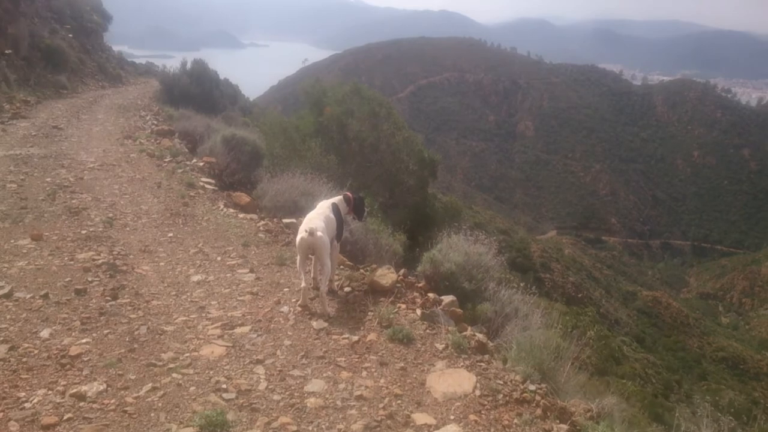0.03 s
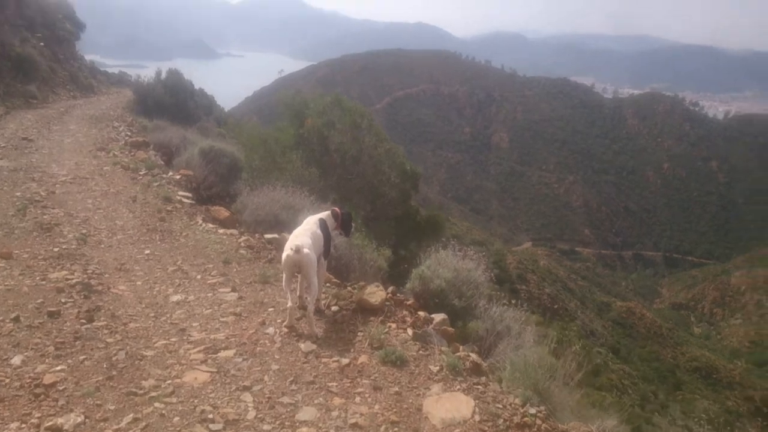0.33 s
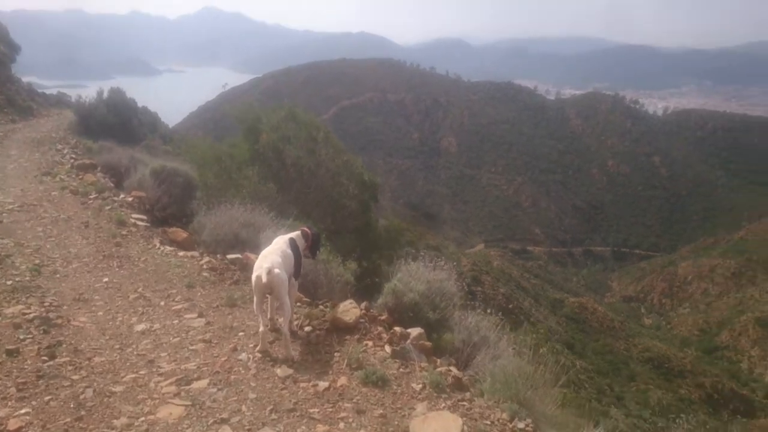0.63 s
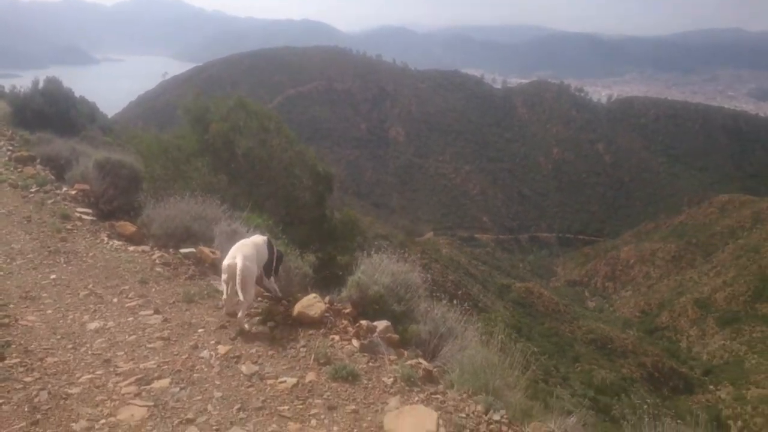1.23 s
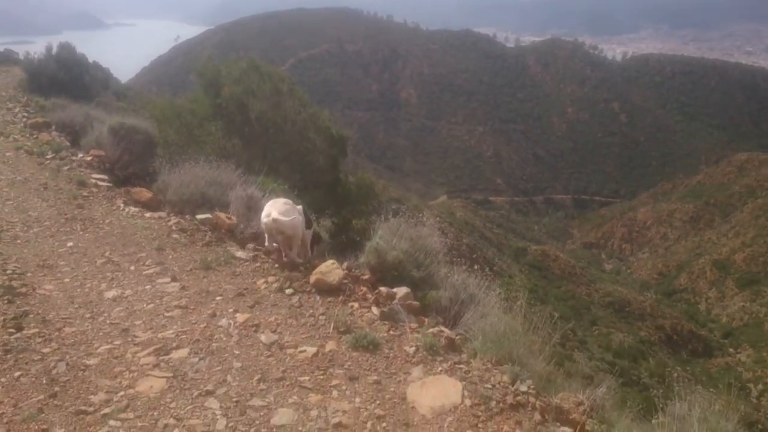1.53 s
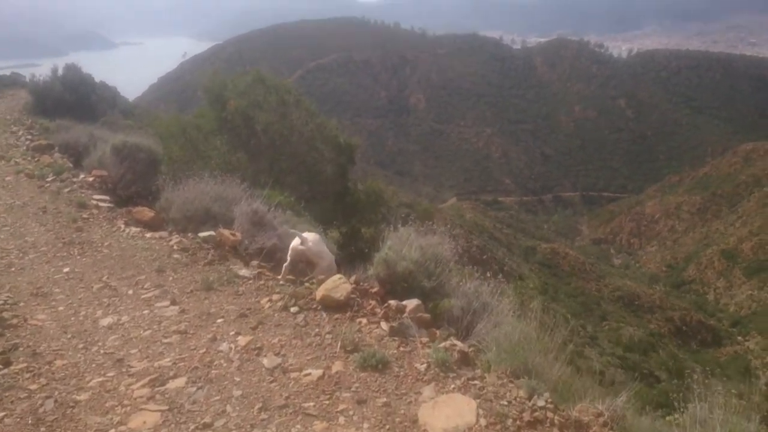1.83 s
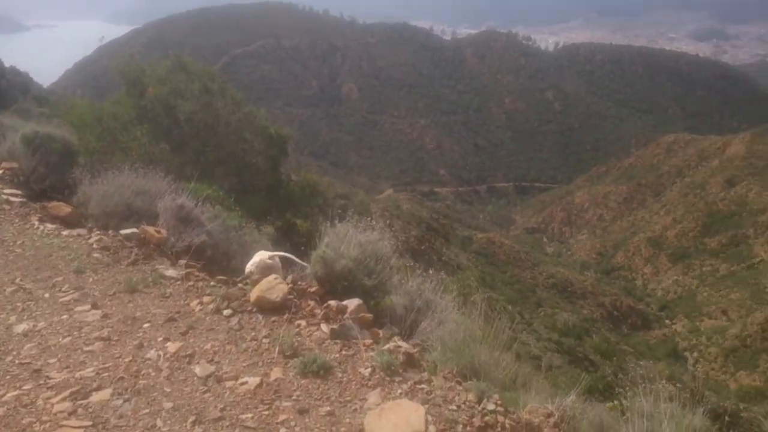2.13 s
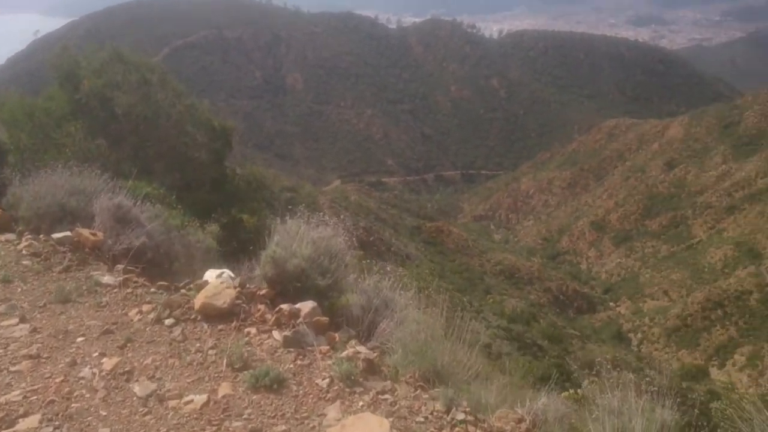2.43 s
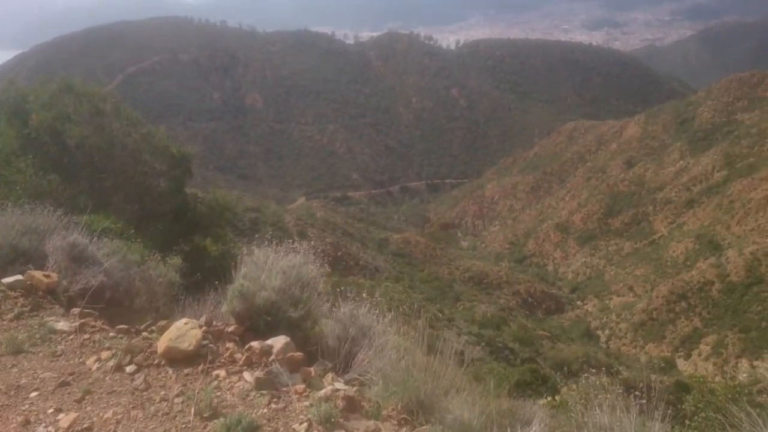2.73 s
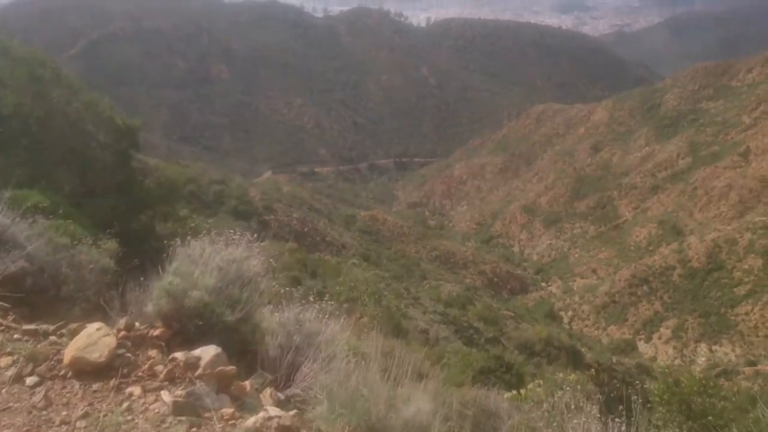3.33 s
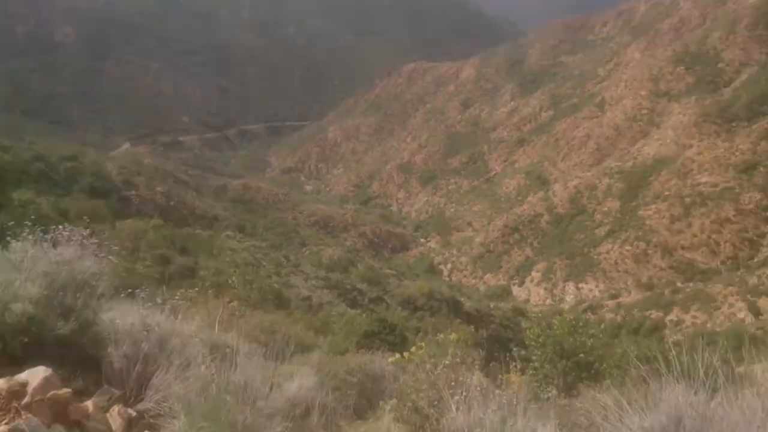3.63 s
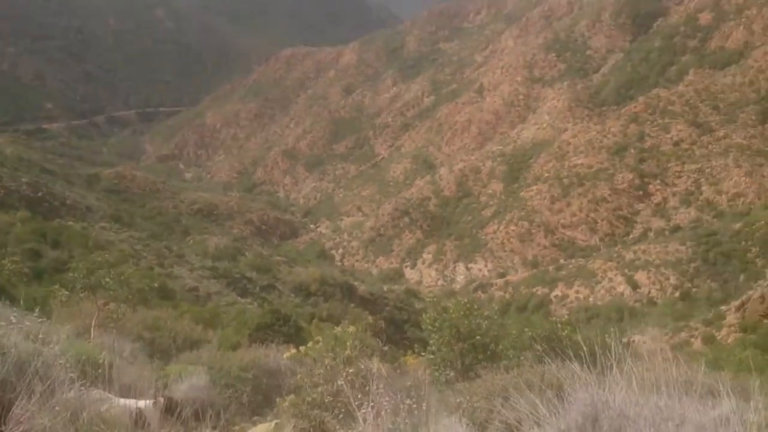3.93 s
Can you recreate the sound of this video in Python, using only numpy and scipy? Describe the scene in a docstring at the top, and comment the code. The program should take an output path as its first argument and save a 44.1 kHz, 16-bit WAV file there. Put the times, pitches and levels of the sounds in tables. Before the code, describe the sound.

One hard crack against the camera, after faint rustling in dry brush and low wind buffeting.

```python
"""Light wind buffets the right port of a hand-held camera over faint hiss; feet shift on loose stones
and fingers rub the case. A dog pushes off the hillside track into dry scrub: stems rustle, leaves
crackle and twigs snap, mostly to the right. Something hard, perhaps a strap clip, strikes by the
left port and bounces; the case rings and buzzes. Faint quick squeaks follow."""
import sys
import numpy as np
from scipy import signal
from scipy.fft import rfft, irfft, next_fast_len
from scipy.io import wavfile
from scipy.ndimage import map_coordinates

SR = 44100
rng = np.random.default_rng(int(sys.argv[2]) if len(sys.argv) > 2 else 0)


def log_audio(samples):
    """Write samples as a 16-bit WAV file to the path given in sys.argv[1]."""
    # one column per channel
    frames = np.atleast_2d(samples).T
    # limit to full scale, then quantise
    limited = np.clip(frames, -1, 1)
    pcm = np.round(limited * 32767).astype(np.int16)
    wavfile.write(sys.argv[1], SR, pcm)


N = 176400

# wind buffeting (time [s], level [dB])
WIND_LEVEL = [(0, -51), (.3, -51.5), (.44, -48), (.66, -47.5), (.85, -56), (1.44, -60.5), (1.51, -46),
              (1.59, -51.5), (1.78, -48), (2.07, -43), (2.2, -38.5), (2.6, -36.5), (2.75, -38),
              (3.3, -38.5), (3.83, -40.5), (3.92, -31)]
# buffeting spectrum (frequency [Hz], gain [dB])
WIND_SPECTRUM = [(18, 13), (45, 2), (80, -5.5), (130, -19.5), (220, -30), (600, -80)]
# wind puffs (time [s], width [s], level [dB])
PUFFS = [(.445, 0.017, -54.5), (1.95, 0.011, -45.5), (2.27, 0.02, -43), (2.44, 0.021, -41),
         (2.555, 0.014, -39), (2.8, 0.022, -41.5), (2.925, 0.04, -33.5), (3.5, 0.0056, -31)]
# background hiss (time [s], level [dB])
HISS_LEVEL = [(.84, -70), (.9, -73.5), (1.45, -73.5), (1.75, -69.5), (4, -66.5)]
# hiss spectrum (frequency [Hz], gain [dB])
HISS_SPECTRUM = [(60, -3), (250, -6), (700, -8.5), (1500, -13.5), (6500, -18.5), (9300, -15), (12000, -19),
                 (15500, -31)]
# hiss balance (frequency [Hz], left over right [dB])
HISS_BALANCE = [(300, 0.5), (4000, -4.5), (8000, 6.5)]
# clicks and scrapes of stones underfoot and, at 2.6-2.7 s, of fingers on the case
# (time [s], gain [dB], centre [Hz], t60 [s])
SCRAPES = [(.3294, -33.5, 744, 0.026), (0.3292, -32.5, 1860, 0.017), (.3355, -40, 820, 0.056),
           (0.445, -49, 950, 0.12), (.482, -38.5, 1550, 0.031), (2.169, -42.5, 1080, 0.033),
           (2.47, -50.5, 1140, 0.16), (2.6, -45, 820, .017), (2.636, -44, 1020, 0.12),
           (2.682, -40, 720, 0.021), (2.844, -41, 800, 0.028), (2.911, -38.5, 1250, 0.006),
           (3.054, -31, 1090, 0.0047), (3.136, -42.5, 600, 0.16), (3.162, -35.5, 2400, 0.1),
           (3.165, -35, 960, 0.055), (3.221, -39.5, 3270, 0.056), (3.397, -35, 2480, 0.015),
           (3.639, -41.5, 965, 0.026), (3.676, -28.5, 1480, 0.0064), (3.9, -37, 1688, 0.029),
           (3.914, -31.5, 650, 0.013), (3.948, -41.5, 2000, 0.016)]
# spectrum common to all scrapes (frequency [Hz], gain [dB])
SCRAPE_SPECTRUM = [(450, 12), (760, 7.5), (1450, -4.5), (2000, 7), (3000, -0.5), (5000, 0), (6200, -8),
                   (11000, -5), (15000, -32)]
# balance of scrapes, scrub and twigs (frequency [Hz], left over right [dB])
RIGHT_BIAS = [(1200, 0), (2000, -20), (7500, -34), (11000, -10)]
# foot thuds (time [s], width [s], level [dB])
FOOT_THUDS = [(.333, 0.0038, -50), (3.17, 0.017, -41.5)]
# spectrum of thuds and rubs (frequency [Hz], gain [dB])
DULL_SPECTRUM = [(60, -10), (140, -6.5), (300, -11), (500, -31), (1000, -37), (7000, -75)]
# fingers on the case (time [s], width [s], level [dB])
FINGER_RUBS = [(.585, 0.022, -56), (2.65, 0.031, -49.5), (3.37, .054, -49.5), (3.71, 0.084, -49)]
# stem rustle (time [s], level [dB])
STEM_LEVEL = [(1.4, -79), (1.68, -71.5), (1.8, -54), (2, -68.5), (2.23, -63), (2.4, -67), (3.05, -66),
              (3.4, -48.5), (3.62, -65.5), (3.8, -61.5), (3.93, -56.5)]
# stem filter (frequency [Hz], gain [dB])
STEM_SPECTRUM = [(250, 3), (700, 3), (1400, -6.5), (2300, -2.5), (3500, -13), (8000, -18)]
# leaf crackle (time [s], level [dB])
LEAF_LEVEL = [(1.4, -78), (1.68, -68), (1.85, -57), (2, -64), (2.23, -65), (2.45, -69), (3, -71.5),
              (3.25, -63.5), (3.73, -59.5), (3.8, -66), (3.91, -55)]
# leaf filter (frequency [Hz], gain [dB])
LEAF_SPECTRUM = [(800, 5.5), (2200, -0.5), (5800, -2.5), (7600, 1), (10000, -15.5), (16000, -22)]
# twigs snapping (time [s], gain [dB], t60 [s])
TWIG_SNAPS = [(1.438, -58, 0.039), (1.584, -50.5, 0.12), (1.711, -52, 0.034), (1.72, -51.5, 0.085),
              (1.751, -54.5, 0.11), (1.827, -57, 0.025), (1.853, -52.5, 0.091), (2.027, -50, 0.016),
              (2.048, -57.5, 0.028), (2.193, -53.5, 0.22), (2.262, -57, 0.093)]
# spectrum common to all twigs (frequency [Hz], gain [dB])
TWIG_SPECTRUM = [(200, 0), (700, 7.5), (2300, 13), (4300, 5.5), (5800, 6.5), (7800, 8), (10500, -13.5),
                 (15500, -21)]
# graze, blow, bounce on the case (time [s], gain [dB], bass [dB], top treble [dB])
CASE_HITS = [(3.3138, -29.5, 10.5, -12), (3.3189, -3, 0, 1), (3.33, -15.5, -6.5, -9)]
# case response to a hit (frequency [Hz], gain [dB])
CRACK_SPECTRUM = [(100, -6), (290, 6), (410, 18), (550, 11), (720, 26), (880, 28), (1300, 24), (1550, 11),
                  (2600, -4), (3100, 14), (4900, 16), (6000, 3), (7200, 13), (9100, 13), (10400, -1),
                  (13600, 0), (16000, -14)]
# its dispersion (frequency [Hz], extra delay [s])
CRACK_DELAY = [(2000, 0.00012), (4000, 0.001334), (7000, 0.000306)]
# case modes (frequency [Hz], level [dB], t60 [s])
CASE_MODES = [(403, -41, 1.1), (726, -25, .2), (3950, -31, .025), (5210, -45, .13), (5350, -44, .16),
              (5730, -43, .17)]
# buzz of loose case parts (frequency [Hz], gain [dB])
BUZZ_SPECTRUM = [(3800, 2), (14000, -21)]


def amp(db):
    """Decibels to gain."""
    return 10 ** (np.asarray(db) / 20)


def unit(x):
    """Scale to rms 1."""
    return x / np.sqrt(np.mean(x ** 2) + 1e-20)


def along(points, hz):
    """Interpolate (frequency [Hz], value) points on a log axis."""
    f, v = np.transpose(points)
    return np.interp(np.log(hz + 1), np.log(f + 1), v)


def level(rows):
    """Gain per sample from (time [s], level [dB]) rows."""
    return amp(np.interp(np.arange(N) / SR, *np.transpose(rows)))


def swells(rows):
    """Gaussian swells from (time [s], width [s], level [dB]) rows."""
    t = np.arange(N) / SR
    return sum(amp(db) * np.exp(-.5 * ((t - at_s) / width_s) ** 2) for at_s, width_s, db in rows)


def wobble(rate_hz):
    """Smooth curve through random knots."""
    knots = rng.standard_normal(int(N * rate_hz / SR) + 4)
    return map_coordinates(knots, [np.arange(N) * rate_hz / SR])


def filtered(x, response):
    """Apply a gain given as a function of frequency."""
    n = x.shape[-1]
    m = next_fast_len(n + SR // 10)
    return irfft(rfft(x, m) * response(np.fft.rfftfreq(m, 1 / SR)), m)[..., :n]


def pan(left_db):
    """Constant-power left and right gains."""
    g = amp(np.atleast_1d(left_db))
    return np.array([g, np.ones_like(g)]) * np.sqrt(2 / (1 + g * g))


def coloured(x, spectrum, balance):
    """Stereo at rms 1, filtered and panned per frequency."""
    return unit(filtered(x, lambda hz: amp(along(spectrum, hz)) * pan(along(balance, hz))))


def noise():
    """Independent white noise per port."""
    return rng.standard_normal((2, N))


def impulse(gain_db, delay_s=np.zeros_like, size=4096):
    """Minimum-phase impulse response plus a delay per frequency."""
    hz = np.fft.rfftfreq(size, 1 / SR)
    cepstrum = irfft(np.log(amp(gain_db(hz))))
    cepstrum[..., 1:size // 2] *= 2
    cepstrum[..., size // 2 + 1:] = 0
    lag_rad = 2 * np.pi * np.cumsum(delay_s(hz)) * SR / size
    return irfft(np.exp(rfft(cepstrum) - 1j * lag_rad))[..., :size // 2]


def add(out, at_s, x):
    """Mix x into out."""
    i = round(at_s * SR)
    n = min(x.shape[-1], N - i)
    out[:, i:i + n] += x[..., :n]


def wind():
    """Lumpy low buffeting and brief puffs, far stronger on the right port."""
    rumble = coloured(noise(), WIND_SPECTRUM, balance=[(40, -20), (150, -13)])
    buffet = unit(rumble * amp(3.2 * wobble(rate_hz=16)))
    flutter = coloured(noise(), [(30, -3), (72, 8), (120, -6.5), (500, -74.5)], balance=[(80, -28)])
    return level(WIND_LEVEL) * buffet + swells(PUFFS) * flutter


def hiss():
    """Faint even hiss."""
    return level(HISS_LEVEL) * coloured(noise(), HISS_SPECTRUM, HISS_BALANCE)


def crunch(t60_s, spike, scatter_db=5):
    """A first contact and a fading spray of others; energy grows with length."""
    t = np.arange(SR // 4) / SR
    sizes = amp(scatter_db * np.repeat(np.clip(rng.standard_normal(len(t)), -2, 2), 32)[:len(t)])
    attack_s = .015 * t60_s
    fade = amp(-60 * t / t60_s) * (1 - np.exp(-t / attack_s))
    spray = (rng.standard_normal(len(t)) + rng.standard_normal((2, len(t)))) * sizes * fade
    spray /= np.linalg.norm(spray, axis=1, keepdims=True)
    spray[:, 0] += spike
    return spray / np.linalg.norm(spray[0]) * np.linalg.norm(fade)


def scrapes(width_oct=.66, skirt_db=-22):
    """Short clicks and scrapes of stones underfoot and fingers on the case; heavier steps thud."""
    out = np.zeros((2, N))
    for at_s, db, centre_hz, t60_s in SCRAPES:
        def body_db(hz):
            hump = np.exp(-.5 * (np.log2((hz + 1) / centre_hz) / width_oct) ** 2) + amp(skirt_db)
            return along(SCRAPE_SPECTRUM, hz) + 20 * np.log10(hump * pan(along(RIGHT_BIAS, hz)))
        contacts = crunch(t60_s, spike=.45)
        click = signal.fftconvolve(contacts, impulse(body_db), axes=1)
        add(out, at_s, amp(db) * click * np.linalg.norm(contacts[0]) / np.linalg.norm(click))
    return out + swells(FOOT_THUDS) * coloured(noise(), DULL_SPECTRUM, balance=[(200, -1)])


def fingers(rough_db=2.5):
    """Fingers rub the case near the left port."""
    friction = swells(FINGER_RUBS) * amp(rough_db * wobble(rate_hz=55))
    return friction * coloured(noise(), DULL_SPECTRUM, balance=[(200, 11.7)])


def crackle(count, top_hz, decay_s, spread_db):
    """Tiny soft-edged fractures, random in time and pitch, with a phase shift per port."""
    strength, onset, pitch, phase, *port_shifts = rng.random((count, 6)).T[:, :, None]
    t = np.arange(SR // 140) / SR
    size = amp(spread_db * np.minimum(-np.log(1 - strength), 4))
    envelope = size * t * np.exp(-t / decay_s)
    angle_rad = 2 * np.pi * (top_hz * pitch * t + phase)
    samples = ((onset * N).astype(int) + np.arange(len(t))).ravel()
    ports = [envelope * np.sin(angle_rad + np.pi * shift) for shift in port_shifts]
    return unit(np.array([np.bincount(samples, grains.ravel(), N)[:N] for grains in ports]))


def scrub():
    """Stems scrape and dry leaves crackle once the dog enters."""
    stems = crackle(count=5000, top_hz=3500, decay_s=.0008, spread_db=3.5) + .4 * noise()
    stems *= amp(2.5 * wobble(rate_hz=35))
    leaves = crackle(count=7000, top_hz=11000, decay_s=.00023, spread_db=3.9) + .5 * noise()
    leaves *= amp(2.9 * wobble(rate_hz=45))
    entered = np.arange(N) / SR > STEM_LEVEL[0][0]
    return entered * (level(STEM_LEVEL) * coloured(stems, STEM_SPECTRUM, RIGHT_BIAS)
                      + level(LEAF_LEVEL) * coloured(leaves, LEAF_SPECTRUM, RIGHT_BIAS))


def twigs(resonance_db=3.8):
    """Each twig gives way in a short bright crunch with its own resonances."""
    out = np.zeros((2, N))
    grid_hz = np.geomspace(300, 12000, 36)
    balance_db = lambda hz: 20 * np.log10(pan(along(RIGHT_BIAS, hz)))
    for at_s, db, t60_s in TWIG_SNAPS:
        resonances = np.column_stack([grid_hz, resonance_db * rng.standard_normal(len(grid_hz))])
        wood = impulse(lambda hz: along(TWIG_SPECTRUM, hz) + along(resonances, hz) + balance_db(hz))
        add(out, at_s, amp(db) * signal.fftconvolve(crunch(t60_s, spike=.12), wood, axes=1))
    return out


def knock(wander=.008, buzz_db=-34.5, buzz_t60_s=.086, jolt_s=3.3152, jolt_width_s=.0039):
    """Hits by the left port crack; the case rings and buzzes; the jolt pushes air into the right port."""
    out, t = np.zeros((2, N)), np.arange(SR) / SR
    for at_s, db, bass_db, treble_db in CASE_HITS:
        tilt = [(1400, bass_db), (3000, 0), (9000, .0042), (13000, treble_db)]
        crack = impulse(gain_db=lambda hz: along(CRACK_SPECTRUM, hz) + along(tilt, hz),
                        delay_s=lambda hz: along(CRACK_DELAY, hz))
        add(out, at_s, amp(db) * pan(left_db=48) * crack)
    ring = np.zeros(SR)
    for hz, db, t60_s in CASE_MODES:
        drift_s = wander * (hz > 2000) * np.cumsum(wobble(rate_hz=400)[:SR]) / SR  # high modes waver
        ring += amp(db - 60 * t / t60_s) * np.sin(2 * np.pi * hz * (t + drift_s))
    buzz = coloured(noise(), BUZZ_SPECTRUM, balance=[(200, 6)])[:, :SR]
    buzz *= amp(buzz_db - 60 * t / buzz_t60_s)
    blow_s = CASE_HITS[1][0]
    add(out, blow_s, pan(left_db=38) * ring + buzz)
    u = (np.arange(N) / SR - jolt_s) / jolt_width_s
    jolt = -amp(-15.5) * u * np.exp(-.5 * u * u)
    return out + pan(left_db=-31) * jolt


def squeaks(count=6, start_s=3.379, gap_s=.0574, width_s=.0019, fall_hz_per_s=122000, jitter_hz=1200):
    """Faint, evenly spaced falling squeaks on the right."""
    out, t = np.zeros((2, N)), np.arange(-SR // 100, SR // 100) / SR
    for k in range(count):
        centre_hz = 5000 * (1 + .0059 * rng.standard_normal())
        hz = centre_hz - fall_hz_per_s * t + jitter_hz * rng.standard_normal(len(t))
        chirp = np.sin(2 * np.pi * np.cumsum(hz) / SR) * np.exp(-.5 * (t / width_s) ** 2)
        add(out, start_s + k * gap_s + t[0], amp(-51) * pan(left_db=-16) * chirp)
    return out


def scene():
    """Open air, no echoes."""
    return wind() + hiss() + scrapes() + fingers() + scrub() + twigs() + knock() + squeaks()


def record(dry):
    """The camera clips at full scale, then low-passes steeply."""
    cutoff_hz = 15900
    return filtered(np.clip(dry, -1, 1), lambda hz: 1 / (1 + (hz / cutoff_hz) ** 80))


dry = scene()
out = record(dry)
log_audio(out)
```